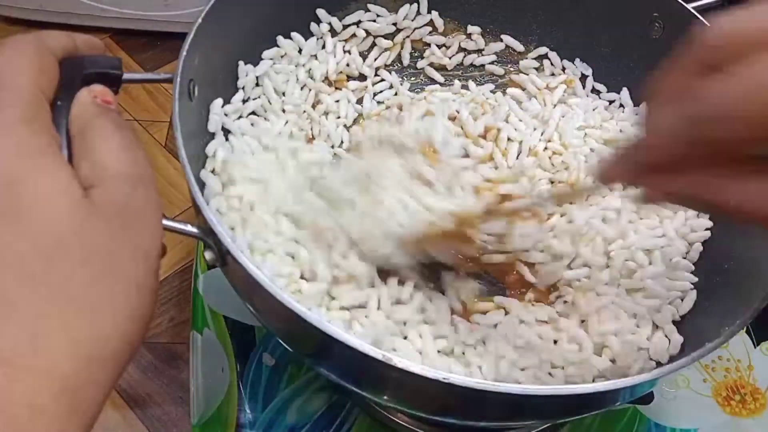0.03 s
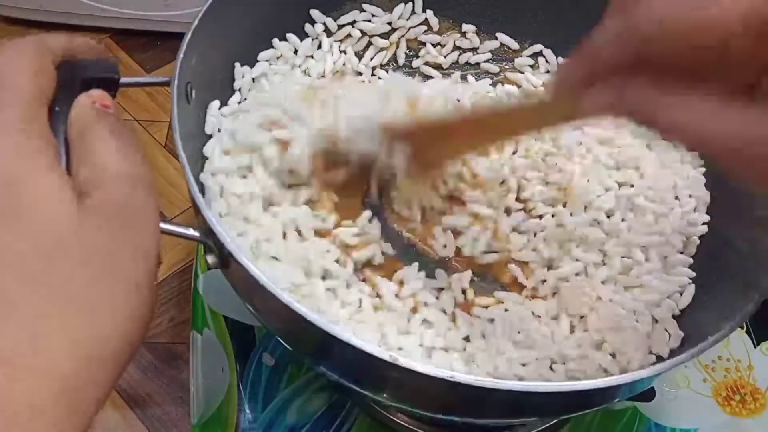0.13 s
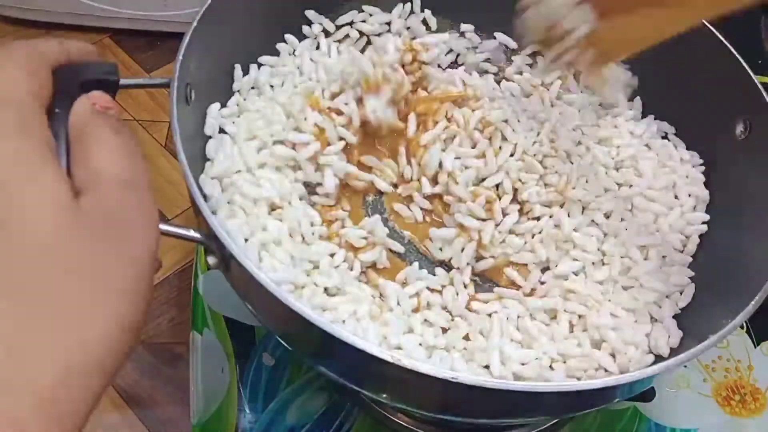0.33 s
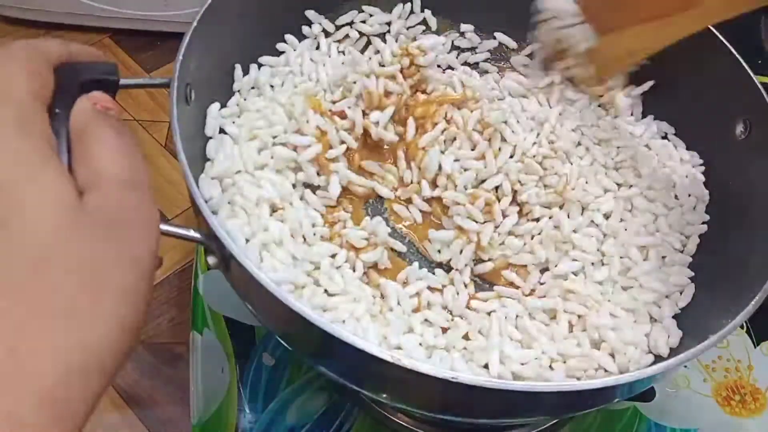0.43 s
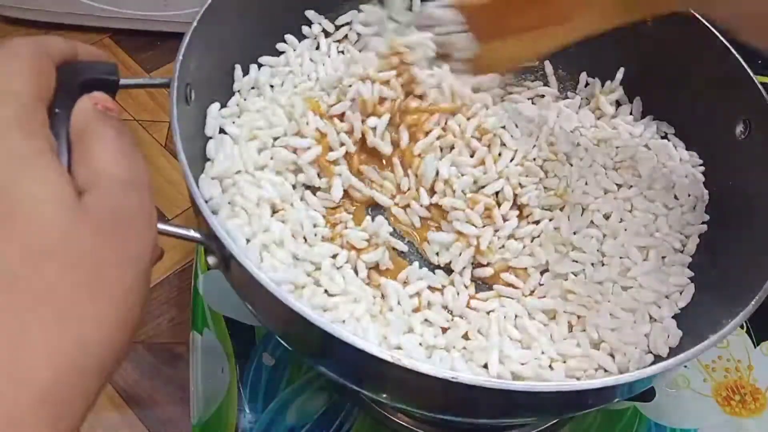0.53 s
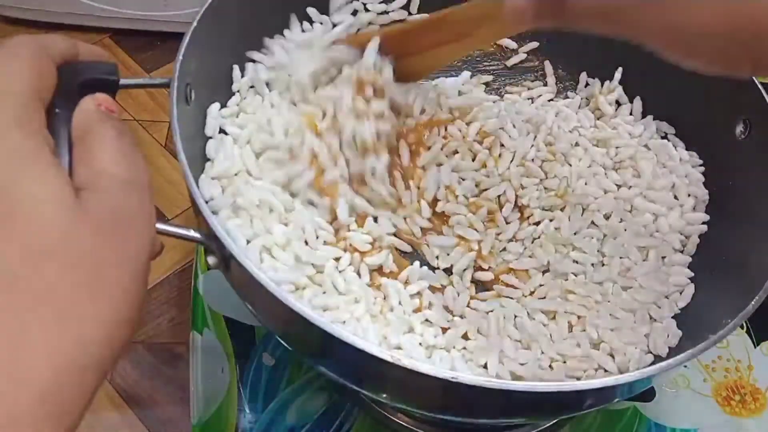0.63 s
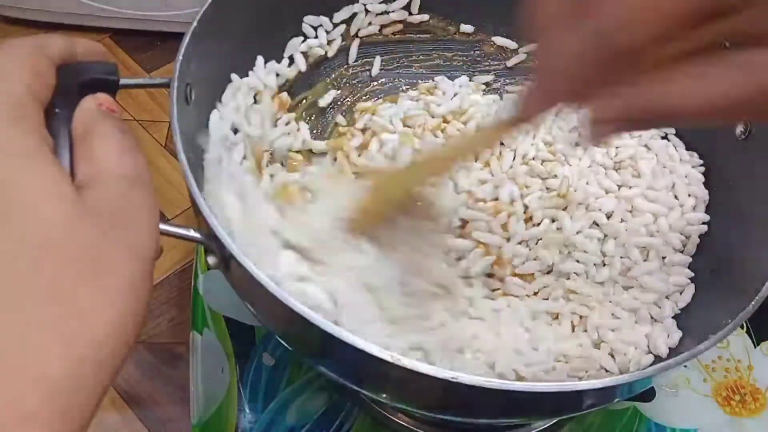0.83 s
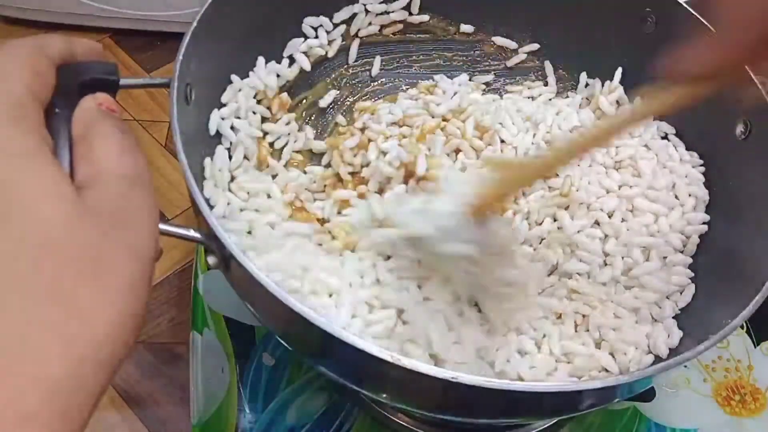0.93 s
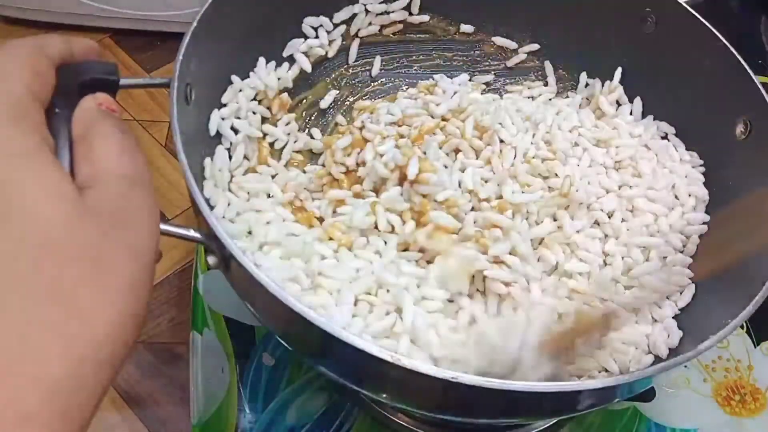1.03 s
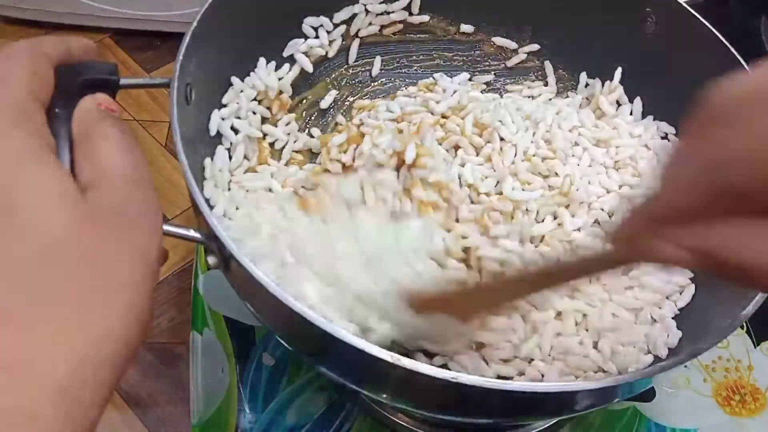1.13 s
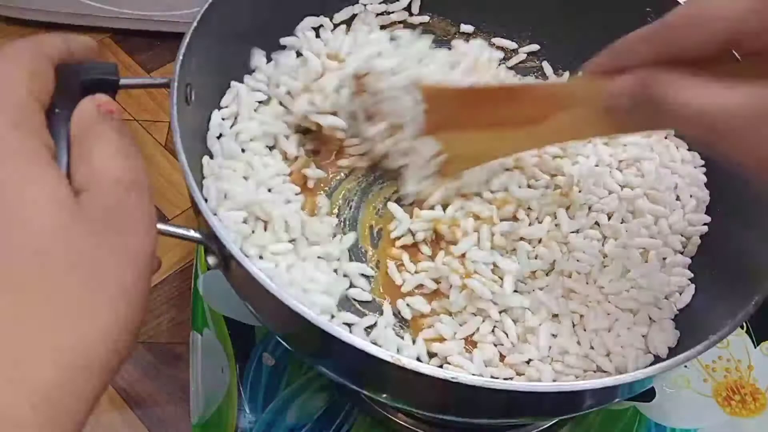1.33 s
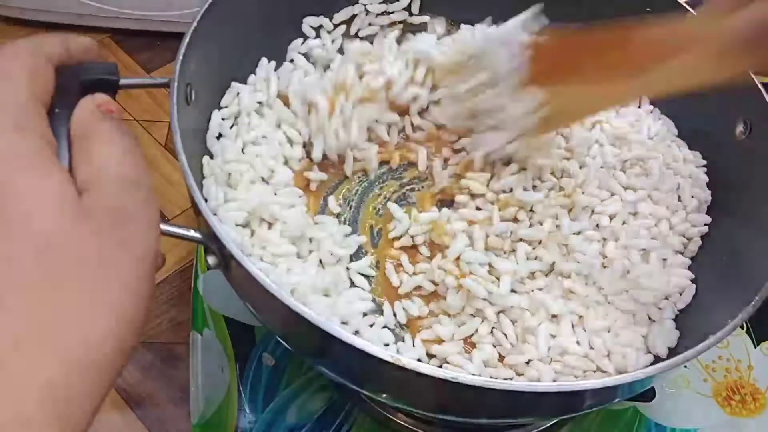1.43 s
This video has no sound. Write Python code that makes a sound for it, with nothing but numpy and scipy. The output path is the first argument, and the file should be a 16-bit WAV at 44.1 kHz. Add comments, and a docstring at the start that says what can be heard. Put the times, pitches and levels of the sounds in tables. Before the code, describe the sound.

Puffed rice rustles crisply as a wooden spatula stirs it in three quick strokes, close by in a kitchen. The spatula knocks the metal pan once at the start, and loose grains tick down between strokes.

```python
"""Stirring puffed rice in a pan

Close by in a kitchen, a wooden spatula stirs puffed rice in a metal pan. Three strokes
rub the dry grains together in a crackling rustle. The spatula knocks on the pan, the pan
hums low as the blade drags over it, and loose grains tick down between strokes."""
import sys
import numpy as np
from scipy import signal
from scipy.io import wavfile
from scipy.ndimage import uniform_filter1d

SR = 44100
rng = np.random.default_rng(int(sys.argv[2]) if len(sys.argv) > 2 else 0)


def transcribe(signal):
    """Save signal, clipped to [-1, 1], as a 16-bit WAV file at the path in sys.argv[1]."""
    frames = np.atleast_2d(signal).T
    limited = np.clip(frames, -1, 1)
    pcm = np.round(limited * 32767).astype(np.int16)
    wavfile.write(sys.argv[1], SR, pcm)


N = 66150
T = np.arange(N) / SR
GRAINS_PER_S, GRAIN_SPREAD_DB = 7000, 2.5


def amp(db):
    """Turns decibels into a gain."""
    return 10 ** (np.asarray(db) / 20)


def unit(x):
    """Scales a signal to an average power of 1."""
    return x / np.sqrt(np.mean(x ** 2) + 1e-20)


def curve(points):
    """Joins (time_s, value) points with straight lines over the whole scene."""
    return np.interp(T, *np.transpose(points))


def add(mix, start_s, sound):
    """Mixes a sound in at the given time."""
    part = mix[max(round(start_s * SR), 0):][:len(sound)]
    part += sound[:len(part)]


def colour(x, points, size=2048):
    """Shapes the tone by (pitch_hz, level_db) points, with no ringing ahead of the sound."""
    hz = abs(np.fft.fftfreq(size, 1 / SR)) + 1
    pitch_hz, level_db = np.transpose(points)
    log_gain = np.log(amp(np.interp(np.log(hz), np.log(pitch_hz), level_db)))
    taps = np.fft.ifft(np.exp(np.conj(signal.hilbert(log_gain)))).real
    return signal.fftconvolve(x, taps[:size // 2])[:len(x)]


def resonate(x, hz, width_hz):
    """Makes a signal ring around one pitch."""
    pole = np.exp((2j * hz - width_hz) * np.pi / SR)
    return signal.lfilter([1], np.poly([pole, pole]), x).real


def wander(samples):
    """A random drift: noise smoothed twice over this many samples."""
    smooth = uniform_filter1d(rng.standard_normal(N), samples, mode="wrap")
    return unit(uniform_filter1d(smooth, samples, mode="wrap"))


def random_snaps(level_db, per_s, spread_db, reference_db=-44.5):
    """Tiny snaps of even power: per_s a second at reference_db, more at higher levels."""
    chance = np.clip(per_s * amp(level_db - reference_db) / SR, 1e-4, .9)
    size = amp(spread_db * np.minimum(rng.exponential(1, N), 4))
    snaps = size * rng.choice([-1, 1], N) * (rng.random(N) < chance)
    return unit(snaps / np.sqrt(chance))


def kitchen_air():
    """The faint, low hush of the kitchen."""
    # tone of the hush: pitch_hz, level_db
    tone = [(25,-21),(50,-20),(80,2.5),(130,0),(250,-2.5),(500,-5),(1500,-32),(5000,-33),(16000,-29)]
    return amp(-65) * unit(colour(rng.standard_normal(N), tone, size=8192))


def room_echo(x, fade_s=0.4):
    """The walls of a small kitchen send back a blur of echoes."""
    t = T[:SR // 2]
    tail = rng.standard_normal(len(t)) * amp(-60 * t / fade_s) * (t > .004)
    return signal.fftconvolve(x, tail / np.linalg.norm(tail))[:N]


def pan_hum(full_db=-40):
    """The dragged pan sings its lowest note over a dull rasp; pressing harder adds a second note."""
    # how hard the blade drags on the pan wall: time_s, level_db
    dragging = [(0,-68),(.34,-71),(.375,-53),(.415,-55.5),(.468,-59.5),(.484,-47),(.505,-46),(.53,-43),(.565,-39),(.64,-44),(.69,-58),(.725,-62),(.745,-54),(.85,-63.5),(1.0,-73)]
    # tone of the rasp: pitch_hz, level_db
    rasp_tone = [(90,-20),(200,0),(270,-3),(380,-2),(480,-11.5),(640,-8.5),(900,-16.5),(1800,-47)]
    # low notes of the whole pan: pitch_hz, level_db, growth_db_per_db, waver_radians
    notes = [(144,1.5,1.03,0.44),(359.6,-2,3.1,0.67)]
    drag_db = curve(dragging) - full_db
    out = amp(-6.5 + 0.97 * drag_db) * unit(colour(rng.standard_normal(N), rasp_tone))
    for hz, db, growth, waver in notes:
        phase = 2 * np.pi * hz * T + waver * wander(samples=900)
        out += amp(db + growth * drag_db) * np.sin(phase)
    return amp(full_db) * out


def blade_scrape():
    """Tiny slips of wood on metal make the pan's middle notes ring."""
    # how hard the blade scrapes the pan floor: time_s, level_db
    scraping = [(0,-54),(.13,-47.5),(.2,-46),(.25,-58),(.35,-68.5),(.52,-69),(.58,-56),(.69,-49.5),(.78,-53),(.89,-44),(.93,-51),(.97,-53.5),(1.01,-70.5),(1.15,-69.5),(1.19,-49),(1.3,-54),(1.39,-48.5),(1.5,-54.5)]
    # notes the scrape wakes: pitch_hz, width_hz, level_db
    notes = [(609.6,47,-14),(731.4,127,3.5),(822,78,-4)]
    level_db = curve(scraping)
    slips = random_snaps(level_db, GRAINS_PER_S, GRAIN_SPREAD_DB)
    ring = sum(amp(db) * unit(resonate(slips, hz, width)) for hz, width, db in notes)
    return amp(level_db - 0.5) * unit(ring)


def grain_ticks(snap_s=0.00058, rattle_s=0.0088, focus_db=9):
    """Loose grains drop from the blade, each a snap with a tiny rattle."""
    # single grains landing: start_s, peak_db, centre_hz
    landings = [(0.341,-49,4530),(0.3662,-46,3020),(0.4054,-40.5,15000),(0.4249,-37,2400),(.4314,-28,5400),(0.4384,-58,7000),(0.4554,-39,1990),(.4582,-48.5,3500),(.465,-45,8500),(.4788,-49,6000),(.4863,-40.5,3900),(.493,-40,9100),(0.535,-37,7960),(.736,-41,14200),(1.014,-55,3450),(1.04,-41,3170),(1.085,-49,8000),(1.1231,-35.5,8000),(1.130,-43,6000),(1.147,-40.5,2230)]
    # tone all ticks start from: pitch_hz, level_db
    base_tone = [(300,-23),(1200,-1),(2500,3),(4000,4.5),(6500,-7),(8500,8.5),(10000,-5.5),(13000,-11),(16000,-7)]
    t, out = T[:2048], np.zeros(N)
    fade = np.exp(-t / snap_s) + amp(-22) * np.exp(-t / rattle_s)
    for start_s, peak_db, centre_hz in landings:
        # turned down by focus_db one octave from this tick's centre
        tone = [(hz, db - focus_db * abs(np.log2(hz / centre_hz)) ** 1.19) for hz, db in base_tone]
        snap = colour(rng.standard_normal(len(t)) * fade, tone)
        add(out, start_s, amp(peak_db) * snap / abs(snap).max())
    return out


def blade_scuffs(rise_s=0.0024):
    """The blade shoves the heap against the pan: a soft, low rasp that dies quickly."""
    # shoves of the blade: start_s, level_db, fade_s
    shoves = [(.107,-33.5,0.014),(0.27,-37,0.027),(1.212,-49.5,.03)]
    # tone of a scuff: pitch_hz, level_db
    tone = [(80,-23),(150,-7),(200,-14),(270,-4),(390,-0.5),(540,-6),(780,-5.5),(1100,-11.5),(2000,-49)]
    level = 0
    for start_s, db, fade_s in shoves:
        age = np.maximum(T - start_s, 0)
        level += amp(db) * np.minimum(age / rise_s, 1) * np.exp(-age / fade_s)
    return level * unit(colour(rng.standard_normal(N), tone))


def blade_crunches():
    """The blade digs into the heap with short, dense bursts of noise."""
    # digs of the blade: middle_s, level_db, half_length_s
    digs = [(0.856,-46.5,0.027),(1.182,-36,0.005),(1.246,-41,0.0032)]
    # tone of a crunch: pitch_hz, level_db
    tone = [(400,-16),(1200,-13),(2500,1),(3600,-2),(6500,-24),(8600,-2.5),(10500,-20),(15500,-18)]
    level = sum(amp(db) * np.exp(-.5 * ((T - middle) / half) ** 2) for middle, db, half in digs)
    return level * unit(colour(rng.standard_normal(N), tone))


def spatula_knocks(band_hz=(150, 1640)):
    """Wood strikes the pan, which the rice muffles; a longer contact gives a duller knock."""
    # hits of the spatula: start_s, strength_db, contact_s
    hits = [(0.0799,-30,0.0003),(0.0814,-22.5,0.00031),(0.0827,-9,0.00039),(0.0947,-26.5,0.00024)]
    # notes of the struck pan: pitch_hz, level_db, fade_s (time to fall 60 dB)
    notes = [(278,-25.5,0.14),(348,-13,0.029),(540,-45,0.039),(700,-8.5,0.031),(749,-5,0.035),(847,-5,0.022),(1048,-10.5,0.054),(1440,-16,0.049)]
    t, out = T[:SR // 4], np.zeros(N)
    ring = sum(amp(db - 60 * t / fade_s) * np.cos(2 * np.pi * hz * t) for hz, db, fade_s in notes)
    for start_s, db, contact_s in hits:
        push = np.exp(-(2 * (t - contact_s) / contact_s) ** 2)
        add(out, start_s, -amp(db) * signal.fftconvolve(ring, push / push.sum()))
    return signal.sosfilt(signal.butter(2, band_hz, "band", fs=SR, output="sos"), out)


def shifting_heap(x, depth_db=2, patch_hz=273, patch_s=0.042):
    """The heap keeps changing shape, so patches of pitch briefly swell and sink."""
    spectrum = signal.stft(x, nperseg=512, noverlap=384)[2]
    patches = rng.standard_normal(spectrum.shape)
    for axis, reach in enumerate([patch_hz * 512 / SR, patch_s * SR / 128]):  # blur pitch, then time
        bell = np.exp(-(2 * np.arange(-30, 31) / reach) ** 2)
        patches = signal.fftconvolve(patches, np.expand_dims(bell, 1 - axis), "same")
    gain = unit(amp(depth_db * unit(patches)))
    return signal.istft(spectrum * gain, nperseg=512, noverlap=384)[1][:N]


def rim_ring(snaps, width_hz=21):
    """The pan's thin metal rings as grains hit it."""
    # notes of the rim: pitch_hz, level_db
    notes = [(600,-10),(1103,2.5),(1190,-7),(1495,-9),(1815,-4),(2247,0.5),(2460,2),(2534,0.5),(2725,-2.5),(3136,-7),(3491,-1.5)]
    t = T[:SR // 4]
    ring = sum(amp(db) * np.cos(2 * np.pi * (hz * t + rng.random())) for hz, db in notes)
    ring *= np.exp(-np.pi * width_hz * t)
    return signal.fftconvolve(snaps, ring / np.linalg.norm(ring))[:N]


def rice_rustle():
    """Grains rub and collide, ring the rim and jog the pan; their brittle skins add a crisp top."""
    # how hard the rice is stirred: time_s, level_db
    effort = [(0.0, -43.5), (0.074, -40.5), (0.082, -40.5), (0.104, -42), (0.228, -48), (0.304, -50),
              (0.342, -59.5), (0.412, -63), (0.43, -71), (0.442, -62), (0.526, -61), (0.538, -49),
              (0.564, -44.5), (0.876, -42), (1.11, -61.5), (1.16, -54), (1.182, -37), (1.206, -43),
              (1.248, -38.5), (1.274, -42.5), (1.448, -46), (1.5, -51)]
    # crackle of the skins, one list per stroke: time_s, level_db
    crisp_strokes = [
        [(0.0, -53), (0.02, -57), (0.086, -51), (0.288, -63), (0.308, -53.5), (0.322, -63), (0.4, -96)],
        [(0.52, -115), (0.536, -45.5), (0.548, -49), (0.624, -43), (0.758, -52), (0.884, -47.5), (1.1, -71.5)],
        [(1.15, -63.5), (1.184, -47), (1.192, -44), (1.248, -40), (1.276, -52.5), (1.334, -50.5), (1.5, -57)],
    ]
    # tone of the rubbing grains: pitch_hz, level_db
    rub_tone = [(100,-15.5),(280,-4.5),(480,-14),(700,-5.5),(900,-6),(1200,-1.5),(1450,-2.5),(2400,0),(3600,-5.5),(5000,-14),(6500,-18.5),(9000,-17),(16000,-43.5)]
    # tone of the skins: pitch_hz, level_db
    skin_tone = [(2000,-16),(4300,-1.5),(6400,-10),(7600,-5),(8450,5.5),(9400,-9),(11000,-14.5),(12800,-14.5),(15500,-8.5)]
    effort_db = curve(effort)
    crisp_db = curve([point for stroke in crisp_strokes for point in stroke])
    snaps = random_snaps(effort_db, GRAINS_PER_S, GRAIN_SPREAD_DB)
    rubbing = unit(colour(snaps, rub_tone)) * amp(effort_db - 1.5)
    skin_snaps = random_snaps(crisp_db, per_s=4500, spread_db=-1)
    crackle = unit(colour(skin_snaps, skin_tone)) * amp(crisp_db - 1)
    ring = rim_ring(snaps * amp(effort_db - 11))
    jog = resonate(rng.standard_normal(N), hz=75, width_hz=80)
    thump = unit(np.gradient(jog)) * amp(effort_db - 21)
    rustle = shifting_heap(rubbing + crackle)
    clumps = amp(0.88 * wander(samples=250))  # the level wavers as clumps give way
    return rustle * clumps + ring + thump


def scene():
    """Rice, spatula and pan over the quiet of the kitchen, in one channel."""
    stirring = rice_rustle() + blade_crunches() + blade_scrape() + blade_scuffs() + grain_ticks()
    knocks = spatula_knocks()
    air = kitchen_air()
    hum = pan_hum()
    echo = room_echo(amp(-17) * stirring + amp(-15.5) * knocks)
    return (air + echo + hum + knocks + stirring)[None]


def record(dry):
    """Cuts away the very highest treble."""
    top_hz = 15850
    taps = signal.firwin(401, top_hz, window=("kaiser", 8), fs=SR)
    return signal.oaconvolve(dry, taps[None], "same")


dry = scene()
out = record(dry)
transcribe(out)
```